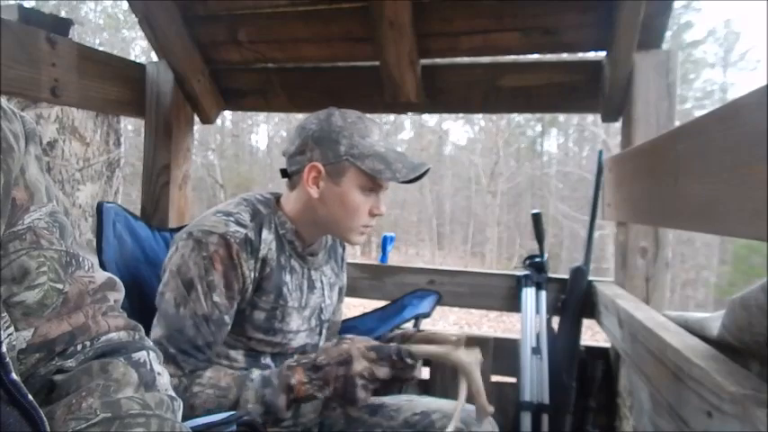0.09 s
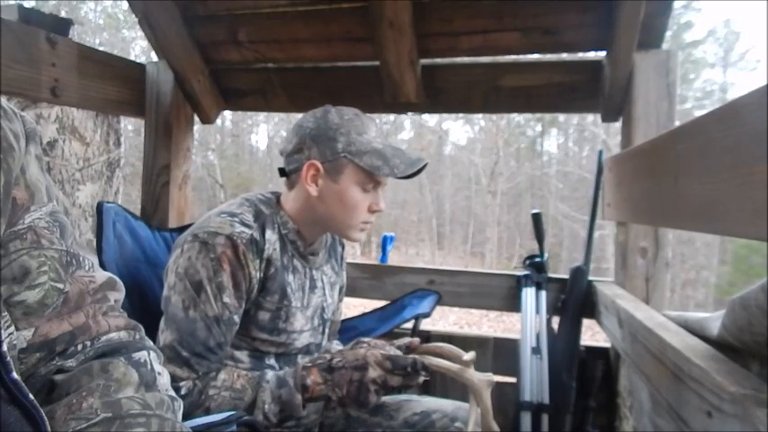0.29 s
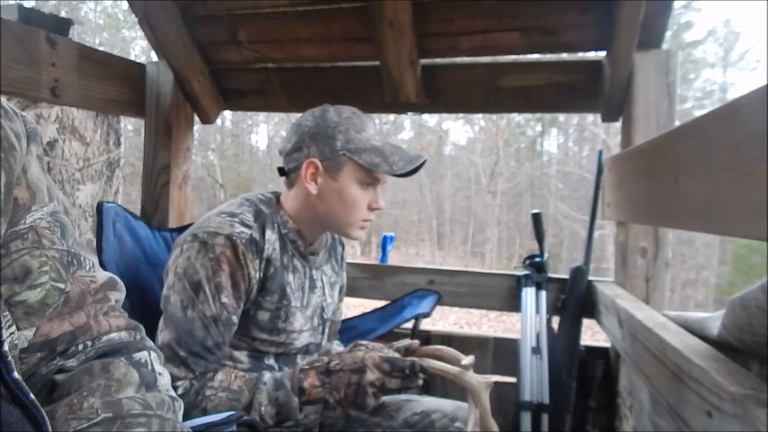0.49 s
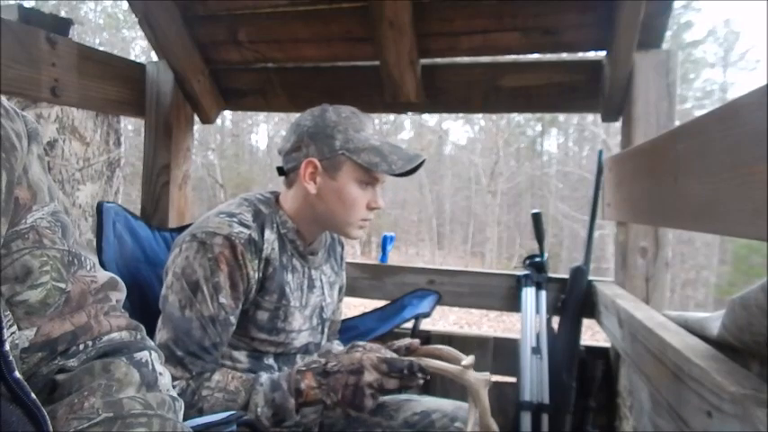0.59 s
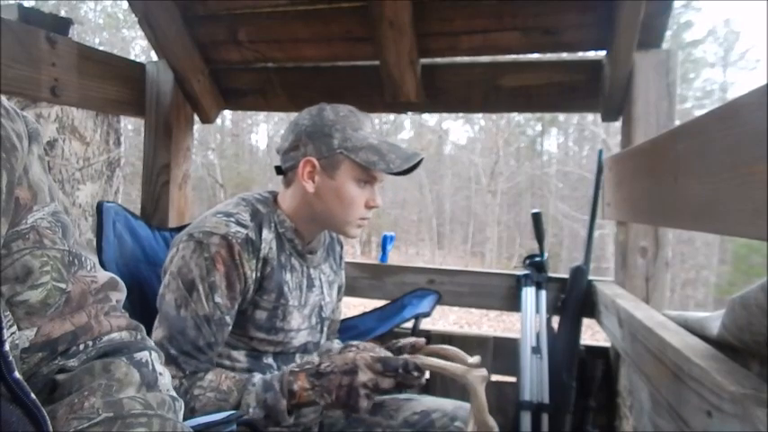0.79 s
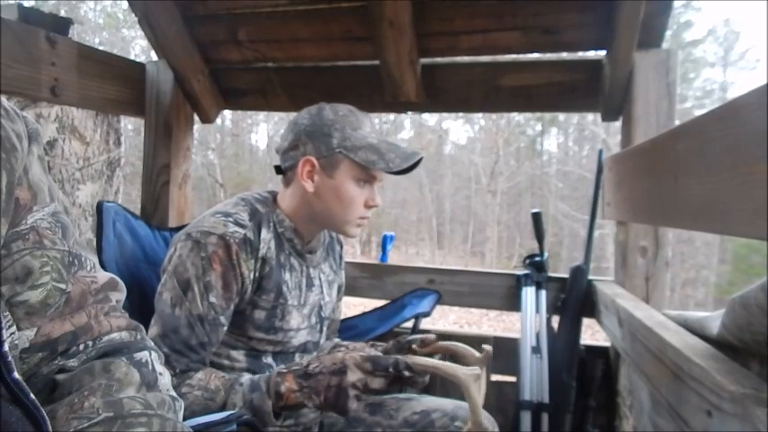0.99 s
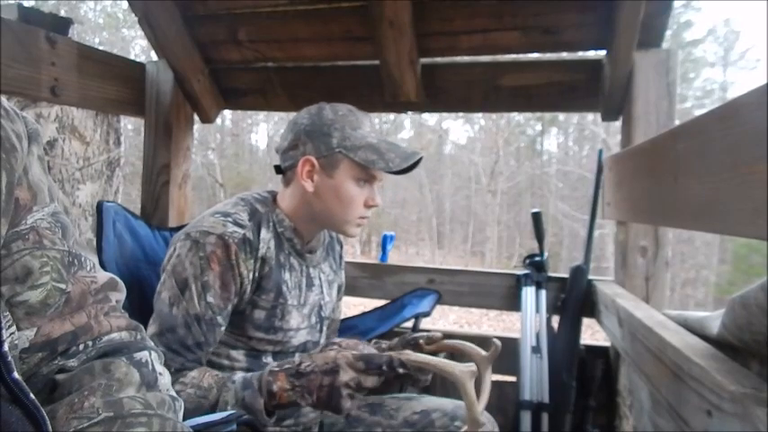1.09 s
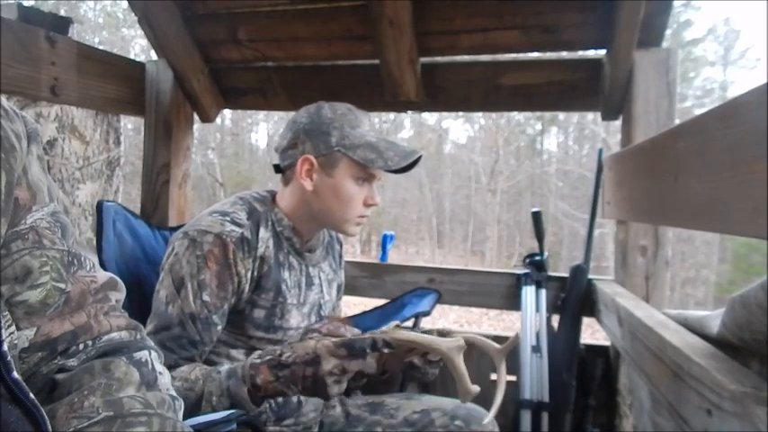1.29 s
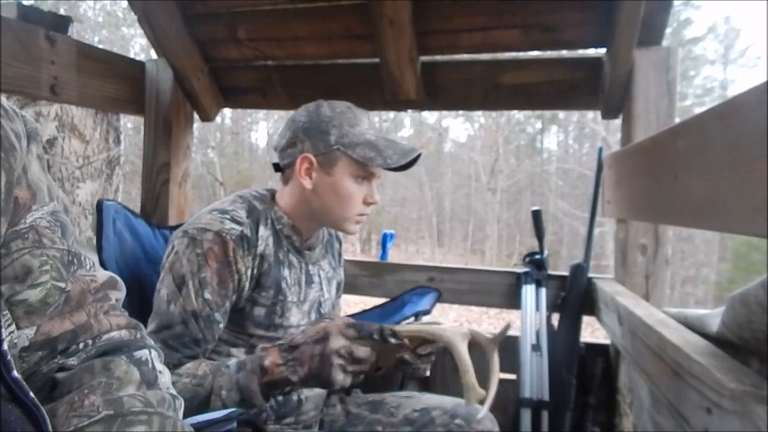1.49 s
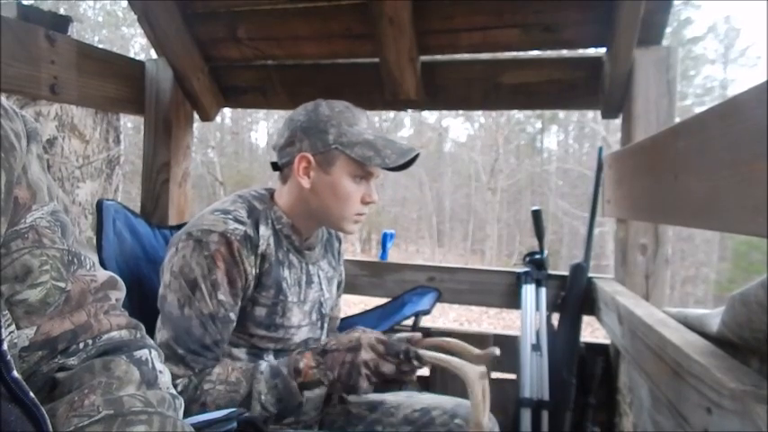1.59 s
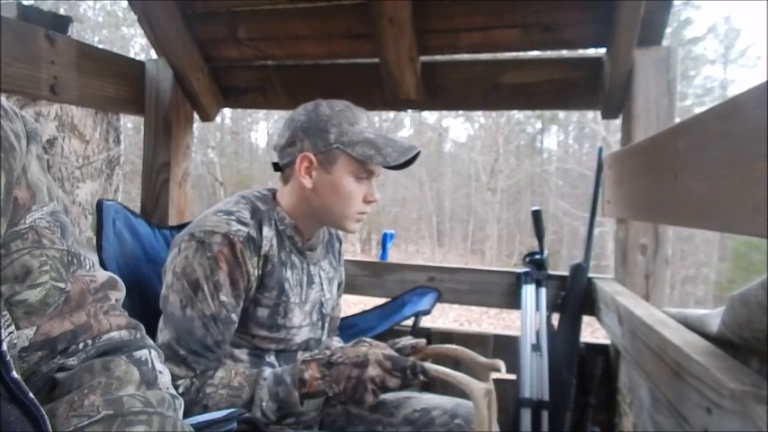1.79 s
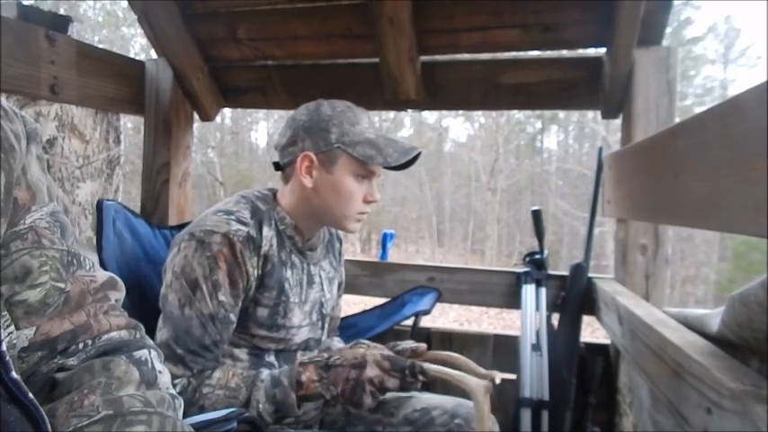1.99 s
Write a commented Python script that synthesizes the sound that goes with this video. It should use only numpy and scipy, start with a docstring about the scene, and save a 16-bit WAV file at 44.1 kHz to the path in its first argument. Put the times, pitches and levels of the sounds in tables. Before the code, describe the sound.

Hard bony antler clacks, close and dry with short wooden reflections: a loud double hit, trailing ticks, soft floor bumps, quiet rubbing and cloth rustle, then a final bright crack over a very faint outdoor hush.

```python
"""Antlers rattled in a hunting stand

Gloved hands knock two antlers together in a small wooden stand: a double clack, a run of lighter
rattling clicks, a soft slide along the bone, then one more sharp clack. Each hit mixes noise bursts
with fading tones of the bone, thickened by echoes from the close roof and walls. Shaped noise makes
the slide, the rustling sleeves, the faint forest hush and the rumble; low tones make the floor bumps."""
import sys
import numpy as np
from scipy import signal
from scipy.fft import rfft, irfft, next_fast_len
from scipy.io import wavfile
from scipy.ndimage import map_coordinates

SR = 44100
rng = np.random.default_rng(int(sys.argv[2]) if len(sys.argv) > 2 else 0)


def generate_wav(signal):
    """Clip the signal to [-1, 1] and save it as 16-bit WAV at the path in sys.argv[1]."""
    frames = np.transpose(np.atleast_2d(signal))
    scaled = np.clip(frames, -1, 1) * 32767
    pcm = np.round(scaled).astype(np.int16)
    wavfile.write(sys.argv[1], SR, pcm)


N = 88200
CLICK_SIZE = SR // 3  # longest click, in samples
T, CLICK_T = np.arange(N) / SR, np.arange(CLICK_SIZE) / SR  # seconds
WALL_WIDTH = 0.68  # side signal relative to the middle

# tones that ring when each part of an antler is hit: [f/Hz, level/dB]
BEAM = [(652, -11.5), (1087, -9.5), (1262, -7.5), (1365, 0), (1492, -11.5), (1885, -4), (2153, -8),
        (2422, -2.5), (2730, -7.5), (2869, -7), (3533, -4.5), (4547, -6.5), (7750, -12.5)]
BROW = [(3127, -8), (3246, -4.5), (3390, -2), (3533, -1.5), (3680, -4), (4560, -7), (5300, -10.5),
        (6500, -12.5), (6710, -8.5), (8700, -12.5)]
TIP = [(2939, 0.5), (3300, -3), (6002, -3), (6303, -2.5), (6710, -2), (9650, -6.5)]
BASE = [(390, -11.5), (662, -11.5), (909, -6), (1065, -5), (1238, 1.5), (1458, -9), (2244, -8), (2422, -9),
        (3407, -8), (3773, -6.5), (4338, -8.5)]
TINE = [(540, -13), (950, -18), (1178, -16), (1297, -12.5), (1857, -7.5), (2105, 0), (2228, -7.5),
        (2398, -2), (2600, -8), (2903, -5.5), (3030, -11.5), (3159, -7.5), (3445, -5), (3720, -6.5),
        (4597, -9), (5630, -0.5), (5889, -3.5), (6371, -8.5)]
FORK = [(540, -8), (1259, -1), (1437, -3), (1850, -7.5), (2153, -7.5), (2287, -5), (2745, 0.5), (2960, -1),
        (4420, -4)]
# resonances of the rubbed beam and of a rubbed tip: [f/Hz, width/Hz, level/dB]
RUBBED_BEAM = [(1300, 180, 3), (2200, 76, -4), (2830, 200, -7.5), (4370, 130, -9.5), (5850, 84, -7.5),
               (8470, 230, -16)]
RUBBED_TIP = [(2906, 320, -2.5), (4270, 160, -9.5), (6260, 150, -12.5)]
# colour of the dry noise of bone on bone: [f/Hz, level per Hz/dB]
CRACK = [(60, -28), (180, -26.5), (330, -11.5), (600, -7.5), (1000, -4), (1600, 5), (3200, 3), (4200, 0),
         (7500, -3), (11000, -18), (13500, -24.5), (15800, -45.5)]


def amp(db):
    """Turn decibels into a gain."""
    return 10 ** (np.asarray(db) / 20)


def unit(x):
    """Scale to an average strength (rms) of 1."""
    return x / np.sqrt(np.mean(x ** 2) + 1e-20)


def blow(x):
    """Scale each stereo click to the energy of ten milliseconds at rms 1."""
    energy = np.sum(x ** 2, axis=(-2, -1), keepdims=True)
    return x / np.sqrt(energy / (2 * SR / 100))


def along(points, hz):
    """Read a curve of (f, value) points, drawn on a logarithmic pitch axis."""
    f, value = np.transpose(points)
    return np.interp(np.log(hz + 1), np.log(f + 1), value)


def pan(db):
    """Left and right gains for a left-minus-right level difference."""
    return amp(np.array([[.5], [-.5]]) * db)


def filtered(x, response):
    """Change each pitch in x by the gain that response gives for it."""
    n = x.shape[-1]
    padded = next_fast_len(n + SR // 4)
    hz = np.fft.rfftfreq(padded, 1 / SR)
    return irfft(rfft(x, padded) * response(hz), padded)[..., :n]


def noise(spectrum, tilt_db=0, size=N):
    """Two unrelated coloured noises, tilted by tilt_db per octave above 300 Hz."""
    def colour(hz):
        octaves = np.log2(np.maximum(hz, 300))
        return amp(along(spectrum, hz) + tilt_db * octaves)
    return unit(filtered(rng.standard_normal((2, size)), colour))


def widen(pair, width):
    """Left and right from a middle and a side signal."""
    middle, side = pair[0], width * pair[1]
    return np.array([middle + side, middle - side]) / np.sqrt(1 + width ** 2)


def wobble(rate):
    """A smooth random curve through rate random points a second."""
    knots = rng.standard_normal(int(N * rate / SR) + 4)
    return map_coordinates(knots, [np.arange(N) * rate / SR])


def add(track, s, sound):
    """Mix a sound into a track, starting at s seconds."""
    part = track[:, max(0, round(s * SR)):][:, :sound.shape[-1]]
    part += sound[:, :part.shape[-1]]


def burst(spectrum, t60, tilt_db=0):
    """Coloured noise that starts at once and fades by 60 dB in t60 seconds."""
    fade = amp(-60 * CLICK_T / t60)
    return widen(noise(spectrum, tilt_db, size=CLICK_SIZE), WALL_WIDTH) * fade


def strokes(rows):
    """A smooth swell around the middle of every stroke, summed as power."""
    swells = (amp(db) ** 2 * np.exp(-(2 * (T - s) / length) ** 2) for s, length, db in rows)
    return np.sqrt(sum(swells))


def level_curve(rows):
    """Straight lines between (time, level) points, in dB."""
    return np.interp(T, *np.transpose(rows))


def steady_hiss():
    """The quietest layer: steady coloured noise under everything."""
    # colour of the hiss: [f/Hz, level per Hz/dB]
    hiss_colour = [(88, -28.5), (150, -2.5), (477, -11.5), (687, -11), (2100, -11.5), (3000, -16),
                   (15000, -35.5)]
    return amp(-79) * noise(hiss_colour)


def rumble():
    """A low, uneven rumble of air: deep noise with a wandering level, stronger on the right."""
    # colour of the rumble: [f/Hz, level per Hz/dB]
    rumble_colour = [(20, -14), (70, 0), (130, -6), (220, -7), (400, -16), (1500, -60)]
    # course of its level before the wobble and panning: [t/s, level/dB]
    rumble_level = [(0, -63.5), (.2, -65.5), (.42, -74), (.65, -67.5), (.95, -68.5), (1.2, -73.5),
                    (1.6, -72), (1.76, -81), (2, -80.5)]
    level = level_curve(rumble_level) + 2 * wobble(17)
    return pan(-3.5) * noise(rumble_colour) * amp(level)


def forest_hush():
    """A faint forest hush: noise whose left and right are more alike at some pitches than others."""
    # colour of the hush: [f/Hz, level per Hz/dB]
    hush_colour = [(88, -34), (150, -8.5), (205, -6.5), (346, -8.5), (381, -7.5), (708, -6), (766, -7.5),
                   (1200, -9), (2100, -20), (5870, -26.5), (6470, -29.5), (9540, -31), (15500, -38)]
    # likeness that sets the share of middle and side before widening: [f/Hz, likeness from -1 to 1]
    hush_alike = [(60, 0.027), (180, 0.69), (550, 0.94), (1650, 0.4), (4970, -0.12), (15000, -0.14)]
    # course of its level, before the wobble, sinking after the loud clacks: [t/s, level/dB]
    hush_level = [(0, -63.5), (0.22, -61), (.48, -73), (0.661, -69), (.8, -65.5), (1.1, -65), (1.4, -65),
                  (1.675, -63), (1.76, -76), (1.859, -80.5), (2, -79)]

    def middle_and_side(hz):
        turn = np.arccos(np.clip(along(hush_alike, hz), -1, 1)) / 2
        return np.array([np.cos(turn), np.sin(turn)])
    air = widen(filtered(noise(hush_colour), middle_and_side), 0.9)
    return unit(air) * amp(level_curve(hush_level) + wobble(14))


def bumps():
    """Shifting weight thuds in the floor boards: fading low tones with an unsteady phase, on the right."""
    # dull bumps, level before attack and panning: [t/s, level/dB, f/Hz]
    floor_bumps = [(0.026, -53, 186), (0.026, -56, 63.5), (0.091, -43.5, 76), (0.178, -53, 90),
                   (0.551, -49, 66.7), (0.714, -47.5, 76.2), (0.716, -52.5, 176), (0.786, -56, 108),
                   (0.862, -49.5, 75), (0.899, -54.5, 72.9), (1.387, -59, 80)]
    attack_s, t60_s, waver_rad = 0.0054, .09, .5
    out = np.zeros((2, N))
    for s, db, hz in floor_bumps:
        waver = waver_rad * np.array([wobble(90), wobble(67)])[:, :CLICK_SIZE]
        swing = np.sin(2 * np.pi * hz * CLICK_T + waver)
        fade = amp(db - 60 * CLICK_T / t60_s) * (1 - np.exp(-CLICK_T / attack_s))
        add(out, s, pan(-14) * fade * swing)
    return out


def sleeves():
    """Rubbing cloth makes grainy noise swishes and a few very short ticks."""
    # swishes, timed at their middle: [t/s, length/s, level/dB]
    swishes = [(1.17, 0.31, -77), (1.33, 0.072, -74), (1.49, 0.061, -77), (1.57, 0.024, -61),
               (1.607, 0.077, -65)]
    # tiny cloth ticks: [t/s, starting level/dB]
    cloth_ticks = [(1.3135, -46), (1.344, -54), (1.49, -61)]
    # colour of the cloth noise: [f/Hz, level per Hz/dB]
    cloth_colour = [(500, -8), (1500, -1), (4000, -0.5), (5200, -7.5), (7000, -0.5), (9800, 3.5),
                    (12500, -5.5), (15500, -16.5)]
    grain = amp(3.5 * wobble(790))
    out = strokes(swishes) * unit(noise(cloth_colour) * grain)
    for s, db in cloth_ticks:
        add(out, s, amp(db) * burst(cloth_colour, t60=0.003, tilt_db=7.5))
    return out


def resonances(part, f):
    """Response of a rubbed part: broad peaks at its own pitches, added together."""
    return sum(amp(db) * 1j * f * width / (centre ** 2 - f ** 2 + 1j * f * width)
               for centre, width, db in part)


def slides():
    """Grainy glove friction sounds the broad resonances of the hand-damped antler."""
    # slides, timed at their middle, level of the bone sound:
    # [t/s, length/s, level/dB, rubbed part, friction brightness/dB per octave]
    glove_slides = [(0.802, 0.071, -70.5, RUBBED_TIP, -1.5), (1.128, 0.14, -66, RUBBED_BEAM, -0.5),
                    (1.187, 0.054, -61.5, RUBBED_BEAM, -3), (1.247, 0.028, -64, RUBBED_BEAM, -2.5)]
    out = np.zeros((2, N))
    for s, length, db, part, tilt_db in glove_slides:
        grain = amp(2 * wobble(250))
        friction = widen(noise(CRACK, tilt_db), WALL_WIDTH) * grain
        bone = unit(filtered(friction, lambda hz: resonances(part, hz)))
        hiss = amp(-10) * unit(friction)
        out += strokes([(s, length, db)]) * (bone + hiss)
    return out


def thuds():
    """The hardest clacks jolt the hands: a short, dry burst of low noise under each."""
    # dull thuds: [t/s, level/dB]
    hand_thuds = [(0.236, -61.5), (1.678, -50)]
    # colour of a thud: [f/Hz, level per Hz/dB]
    thud_colour = [(20, -1), (100, -1), (250, -6), (500, -16), (1500, -53.5)]
    out = np.zeros((2, N))
    for s, db in hand_thuds:
        add(out, s, amp(db) * blow(burst(thud_colour, t60=.02)))
    return out


def in_stand(x, wet_db):
    """Add dense, uneven reflections of the close roof and walls: x convolved with fading noise."""
    delay_s, hold_s, t60_s, grain_db = 0.0019, 0.0056, .05, 5
    n = x.shape[-1]
    t = np.arange(n) / SR
    grain = grain_db * np.clip(rng.standard_normal(n), -2, 2)
    fade = amp(-60 * np.maximum(t - hold_s, 0) / t60_s + grain)
    walls = widen(rng.standard_normal((2, n)), WALL_WIDTH) * fade * (t > delay_s)
    answer = irfft(rfft(x, 2 * n) * rfft(walls, 2 * n))[..., :n]
    return blow(blow(x) + amp(wet_db) * blow(answer))


def ring(modes):
    """Fading tones of the bone with reflections; levels vary by blow, phases also by ear."""
    attack_s, scatter_db, spread_rad = 0.002, 1, 0.85
    t = np.arange(CLICK_SIZE // 2) / SR
    hz, db = np.transpose(modes)[:, :, None, None]  # axes: tone, ear, time
    phase = rng.uniform(0, 2 * np.pi, hz.shape) + spread_rad * rng.standard_normal((len(hz), 2, 1))
    width_hz = 55 + .009 * hz  # a wider tone dies sooner
    decay = np.exp(-np.pi * width_hz * t) * (1 - np.exp(-t / attack_s))
    tones = in_stand(decay * np.sin(2 * np.pi * hz * t + phase), wet_db=-2.5)
    gains = amp(db + scatter_db * rng.standard_normal(hz.shape))
    return blow(np.sum(gains * tones, axis=0))


def placed(x):
    """Place the antlers by pitch: narrow bass, wide treble, the left ear slightly late."""
    # left-minus-right level difference: [f/Hz, difference/dB]
    antler_pan = [(500, -1), (1200, 0.35), (2800, -1.5), (5500, -2.5), (9000, 3.7), (13000, -2)]
    # gain of the side signal: [f/Hz, level/dB]
    antler_side = [(300, -9.5), (1200, -7.5), (2400, 0), (5000, -1.5), (12000, 1.5)]
    left_lag_s = .00004
    mid = (x[0] + x[1]) / 2
    side = filtered((x[0] - x[1]) / 2, lambda hz: amp(along(antler_side, hz)))

    def ears(hz):
        lag = np.exp(np.array([[-1], [1]]) * 1j * np.pi * hz * left_lag_s)
        return pan(along(antler_pan, hz)) * lag
    return filtered(np.array([mid + side, mid - side]), ears)


def antlers():
    """Each contact snaps, cracks, knocks and rings the two parts that meet."""
    # contacts, levels before filtering and placing: [t/s, part of one antler, its level/dB,
    # part of the other, its level/dB, hollow knock level/dB, crack level/dB, dry snap level/dB,
    # crack brightness/dB per octave]
    contacts = [ (0.2156, BEAM, -40.5, FORK, -44.5, -53, -46.5, -63, 3),
                (0.2282, BEAM, -26.5, BROW, -30, -42, -35.5, -37, 1),
                (0.2319, BEAM, -28, BASE, -34.5, -49, -35, -59, -3),
                (0.2370, BROW, -27, BEAM, -33.5, -48, -27, -33.5, 3),
                (0.2395, BROW, -26.5, BASE, -40, -51, -41, -31, 2),
                (0.2470, BEAM, -42, BROW, -56, -47, -39, -49, -1),
                (0.2630, TIP, -49, FORK, -42, -54, -43.5, -58, 9),
                (0.2708, TIP, -47.5, BASE, -47, -49.5, -50.5, -62, 2),
                (0.2895, TIP, -44.5, FORK, -48, -64, -48.5, -55, 3),
                (0.3018, TIP, -60, FORK, -47.5, -64, -55.5, -71, -1.5),
                (0.3337, TIP, -63.5, FORK, -51, -72, -49.5, -66, 4),
                (0.3364, TINE, -56, FORK, -43, -72, -55, -65, -3),
                (0.3930, BASE, -61.5, FORK, -60.5, -60.5, -68, -67, 1.5),
                (0.397, BASE, -57, FORK, -61.5, -64.5, -59.5, -61, -3),
                (0.4230, BASE, -49, FORK, -55, -56.5, -51, -63.5, -2.5),
                (1.6800, TINE, -26.5, TIP, -39, -46.5, -29, -30.5, 5),
                (1.6960, TIP, -35, TINE, -32.5, -49, -36.5, -50, 3.5),
                (1.7010, BROW, -39, BASE, -41, -46.5, -36, -46.5, -0.5)]
    # colour of the hollow knock of the grip: [f/Hz, level per Hz/dB]
    knock_colour = [(40, -29), (170, -28), (330, -7), (600, 0), (950, -1.5), (1300, -1), (2000, -20),
                    (5000, -48.5)]
    # colour of the stand's weak late echo: [f/Hz, level per Hz/dB]
    tail_colour = [(150, -12.5), (600, -1), (3000, 2), (6000, -4), (9000, -9.5), (15000, -25)]
    out = np.zeros((2, N))
    bite = 1 - np.exp(-CLICK_T / 0.0014)  # soft start of the crack, in seconds
    for s, one, one_db, other, other_db, knock_db, crack_db, snap_db, tilt_db in contacts:
        crack = in_stand(bite * burst(CRACK, 0.01, tilt_db), wet_db=0)
        snap = blow(burst(CRACK, 0.02, tilt_db + 2))  # no reflections
        knock = in_stand(burst(knock_colour, t60=0.0095), wet_db=-12)
        late_echo = amp(-34) * burst(tail_colour, t60=0.53)
        add(out, s, amp(crack_db) * (crack + late_echo))
        add(out, s, amp(snap_db) * snap)
        add(out, s, amp(knock_db) * knock)
        add(out, s, amp(one_db) * ring(one) + amp(other_db) * ring(other))
    # a low cut at 257 Hz keeps the clacks lean and free of boom
    low_cut = signal.butter(2, 257, "high", fs=SR, output="sos")
    return placed(signal.sosfilt(low_cut, out))


def scene():
    """The quiet around, the hands that move the antlers, and the antlers."""
    quiet = steady_hiss() + rumble() + forest_hush()
    hands = bumps() + sleeves() + slides() + thuds()
    return quiet + hands + antlers()


def record(dry):
    """Cut off the treble very steeply at the top of the band."""
    top_hz = 15600
    return filtered(dry, lambda hz: 1 / np.sqrt(1 + (hz / top_hz) ** 160))


dry = scene()
out = record(dry)
generate_wav(out)
```